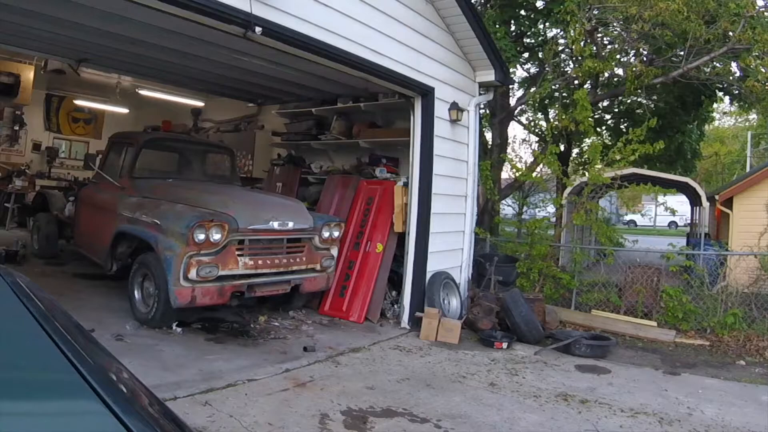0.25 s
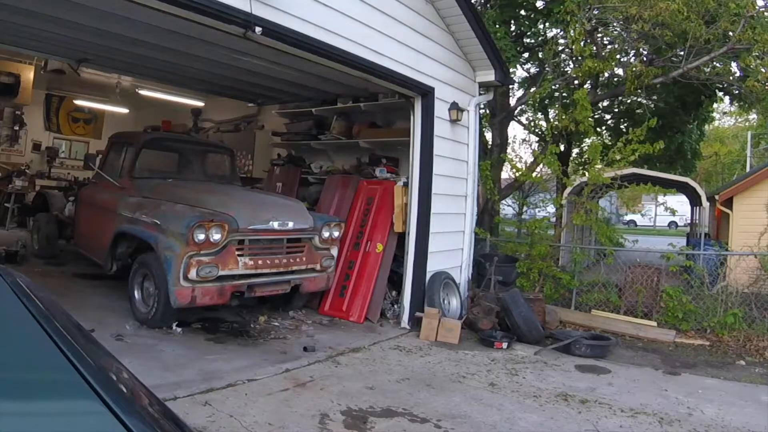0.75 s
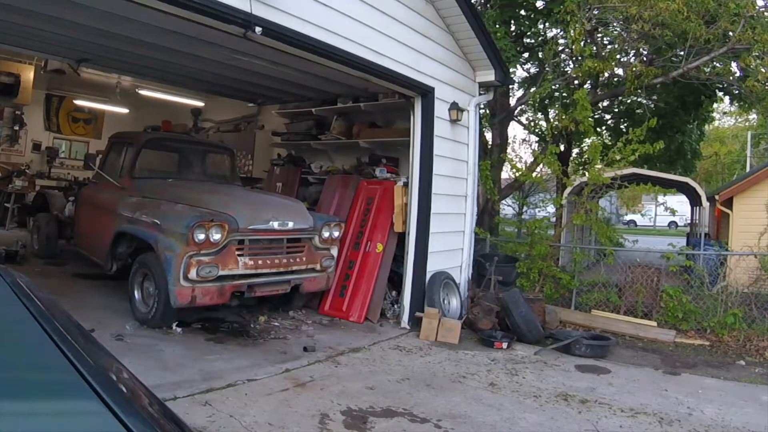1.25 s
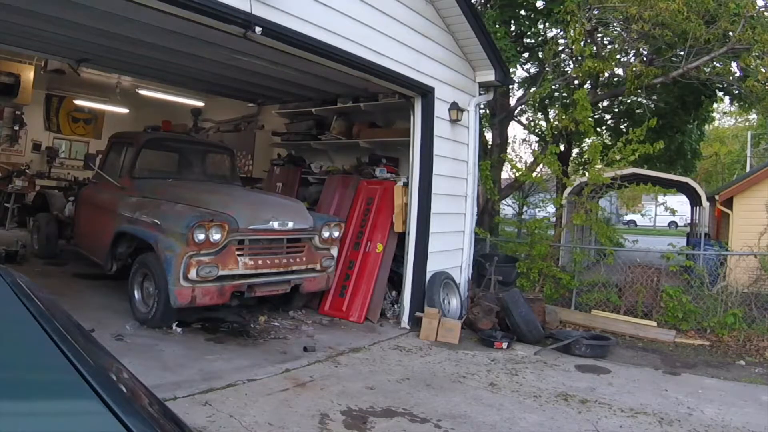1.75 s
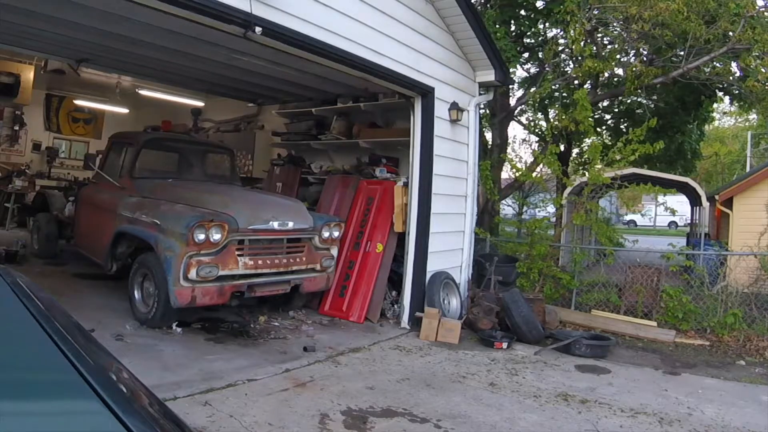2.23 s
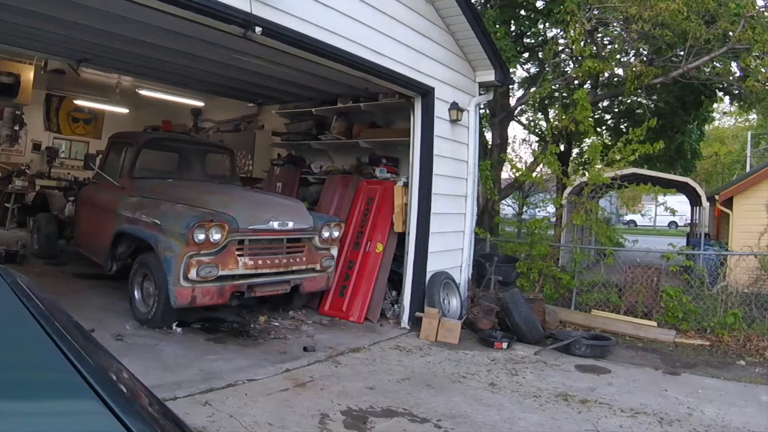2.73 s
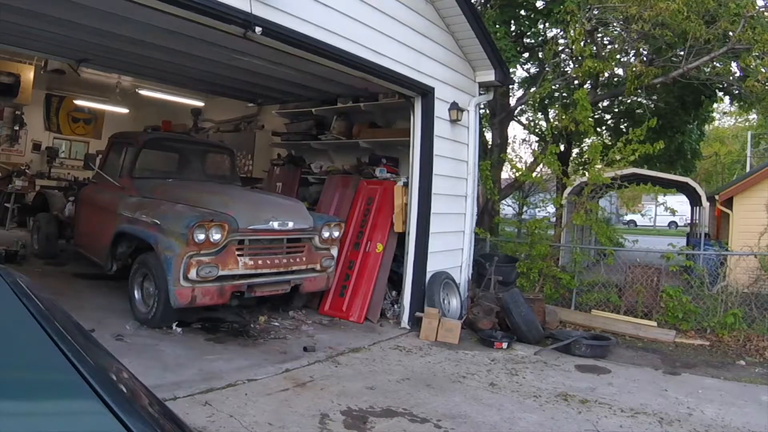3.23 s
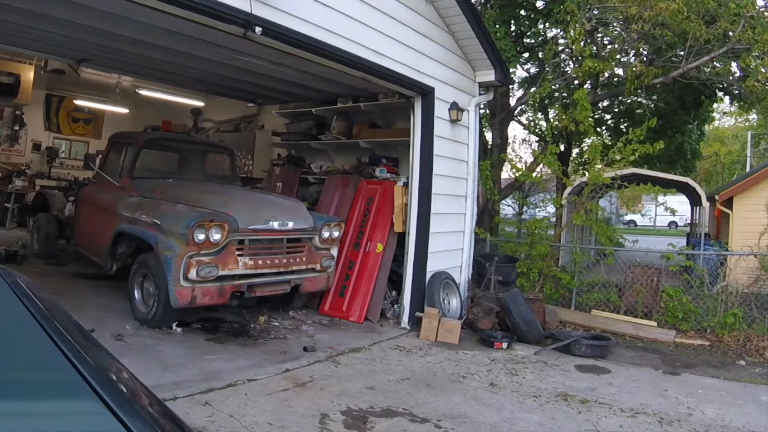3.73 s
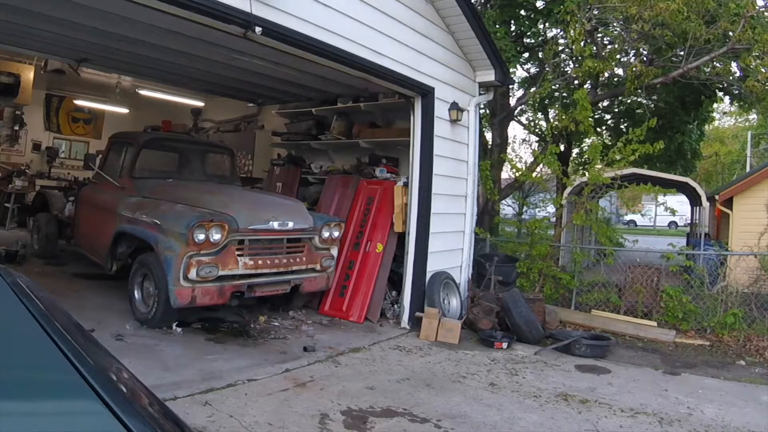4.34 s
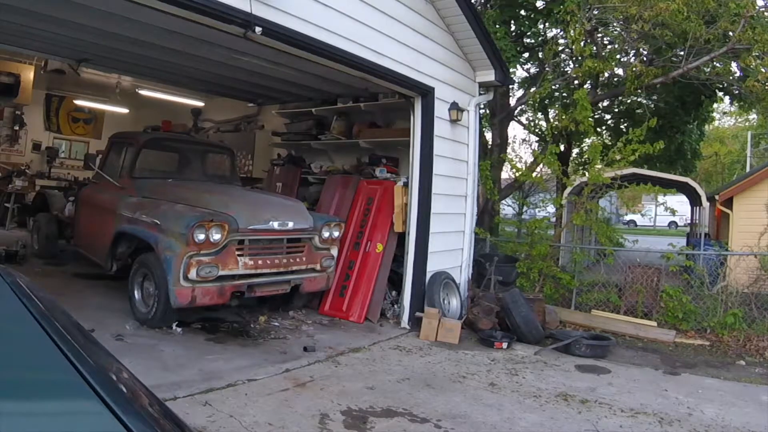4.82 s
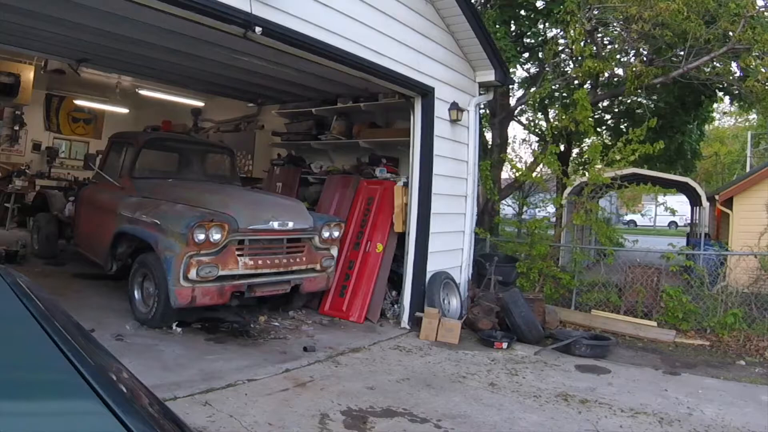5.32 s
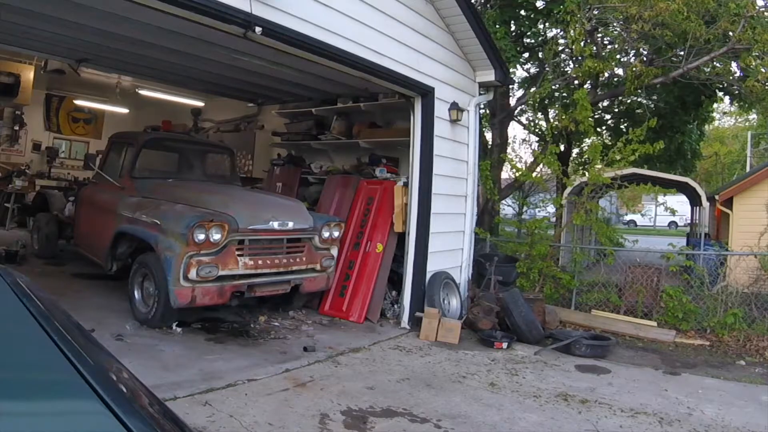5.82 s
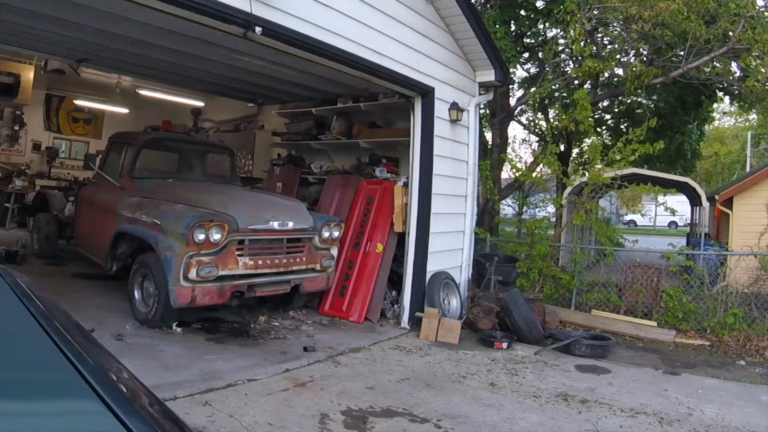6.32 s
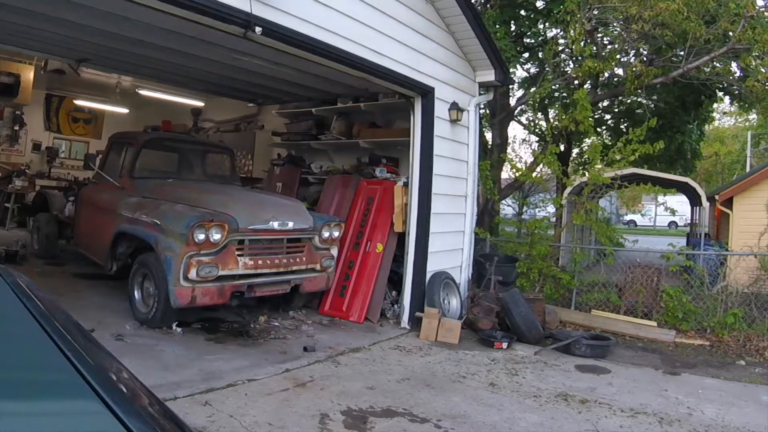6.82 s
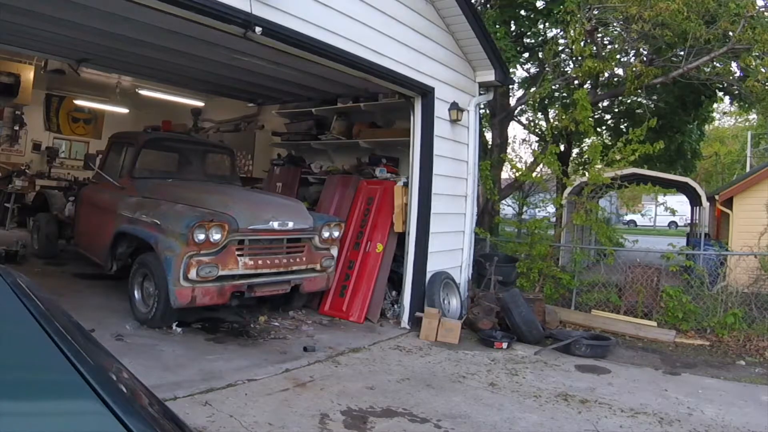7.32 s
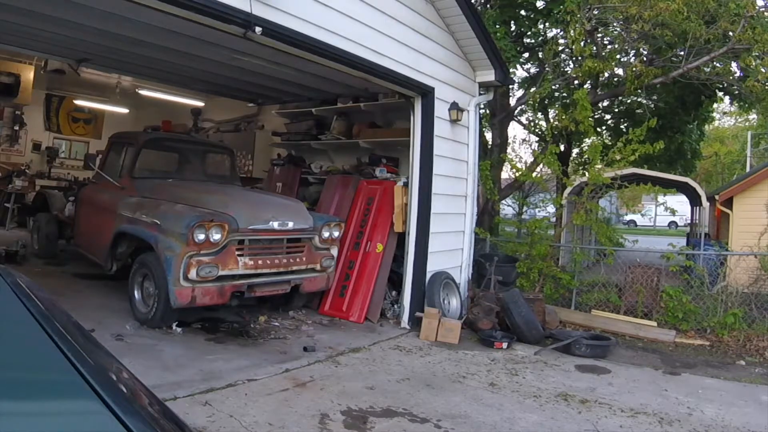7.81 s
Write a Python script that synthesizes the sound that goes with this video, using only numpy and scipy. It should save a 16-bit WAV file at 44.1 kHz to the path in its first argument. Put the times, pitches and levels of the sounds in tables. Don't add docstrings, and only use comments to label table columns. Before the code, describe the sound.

Quiet drive with a bird whistling and a pedal thump, then an old truck's starter grinds, pops, and the V8 catches, flares and settles lumpily.

```python
import sys
import numpy as np
from scipy import signal
from scipy.fft import rfft, irfft, next_fast_len
from scipy.io import wavfile
from scipy.ndimage import uniform_filter1d

SR = 44100
rng = np.random.default_rng(int(sys.argv[2]) if len(sys.argv) > 2 else 0)


def voltage_ratio(decibels):
    exponent = np.asarray(decibels, float) / 20
    return 10 ** exponent


def wav_out(sig):
    wavfile.write(sys.argv[1], SR, np.round(np.clip(np.atleast_2d(sig).T, -1, 1) * 32767).astype(np.int16))


N = 355446
TIME = np.arange(N) / SR


def curve(*tables):
    s, *columns = np.transpose([row for table in tables for row in table])
    return [np.interp(TIME, s, column) for column in columns]


def level(x, db=0):
    return x * voltage_ratio(db) / np.sqrt(np.mean(x ** 2))


def blend(share, db):
    return 1 + share * (voltage_ratio(db) - 1)


def ring(x, hz, width):
    return signal.lfilter(*signal.iirpeak(hz, hz / width, SR), x)


def butter(x, order, hz, kind="low"):
    return signal.sosfilt(signal.butter(order, hz, kind, fs=SR, output="sos"), x)


def colour(x, points):
    size = next_fast_len(N)
    hz, db = np.transpose(points)
    log_hz = np.log(np.arange(size // 2 + 1) * SR / size + 1)
    gain = voltage_ratio(np.interp(log_hz, np.log(hz), db, left=-90, right=-90))
    return level(irfft(rfft(x, size) * gain, size)[:N])


def clicks(s, size):
    at = np.clip(s * SR, 0, N - 2)
    i = at.astype(int)
    return np.bincount(i, size * (i + 1 - at), N) + np.bincount(i + 1, size * (at - i), N)


def walk(rate):
    k = int(SR / rate)
    steps = np.repeat(rng.standard_normal(N // k + 1), k)
    return level(uniform_filter1d(steps, k)[:N])


def tail(x, t60):
    return signal.lfilter([1], [1, -np.exp(-np.log(1000) / (t60 * SR))], x)


def wall_noise(t60):
    return rng.standard_normal(SR // 2) * np.exp(-np.log(1000) * TIME[:SR // 2] / t60)


def garage(x, wet_db, t60):
    walls = wall_noise(t60)
    return x + voltage_ratio(wet_db) * signal.fftconvolve(x, walls / np.sqrt(np.sum(walls ** 2)))[:N]


def swells(events, rise_s, fall_db_s):
    gain = np.zeros(N)
    for s, hold, db in events:
        part = slice(max(int((s - rise_s) * SR), 0), int((s + hold + 70 / fall_db_s) * SR))
        late = TIME[part] - s
        gain[part] += voltage_ratio(db - fall_db_s * (late - hold).clip(0)) * (1 + late / rise_s).clip(0, 1) ** 2
    return gain


# time in seconds, firings per second.
CRANKING = [
    (2.5, 14),
    (3.1, 22),
    (3.5, 36),
    (3.75, 26),
    (4.1, 34),
]
# time in seconds, firings per second.
RUNNING = [(4.4, 43.6), (4.55, 49.25), (4.7, 52.74), (4.85, 59.71), (5, 62.69), (5.2, 62.33), (5.6, 59.81),
           (6, 58.76), (6.3, 58.25), (7.2, 58.05), (7.6, 55.8), (8, 54.4)]


def crank():
    first_cylinder_s = 5.8574
    slots = np.cumsum(curve(CRANKING, RUNNING)[0]) / SR
    return slots - np.interp(first_cylinder_s, TIME, slots)


# pipe (0 left, 1 right), strength in dB, header delay in ms.
CYLINDERS = [(0, -4.5, .07), (1, -2.8, 2.33), (1, 5, 4.17), (0, 1, -1.18), (1, 6.5, .23), (0, 1.2, -1.83),
             (0, 2.4, -1.8), (1, -1.7, 2.09)]
# time in seconds, level in dB.
BURN = [(2.45, -35), (2.66, -45), (2.87, -45.5), (3.1, -37), (3.5, -35), (3.64, -39), (4.0, -38.5),
        (4.3, -35), (4.46, -32.5), (4.62, -21), (4.75, -24.5), (5.2, -26.5), (5.6, -24.5), (6, -25.5),
        (7.2, -24.5), (8.06, -24.5)]
# time in seconds, spread in dB.
UNEVEN = [
    (2.45, 3),
    (4.3, 2.5),
    (4.48, .7),
    (4.75, .7),
    (5.1, 1.5),
    (5.8, .8),
    (7.2, .8),
    (7.7, 1.3),
]
# time in seconds, peak in dB.
POPS = [(2.502, -23.5), (3.113, -17.5), (3.135, -23), (3.161, -8), (3.175, -15), (3.198, -21), (3.223, -21),
        (3.285, -26), (3.317, -21), (3.395, -22), (3.415, -27), (3.482, -21), (3.511, -26), (3.83, -15),
        (3.849, -16.5), (3.865, -27), (3.889, -25), (4.085, -19), (4.123, -14), (4.139, -16.5),
        (4.149, -27), (4.262, -18.5), (4.346, -14), (4.358, -13.5), (4.375, -23), (4.435, -22),
        (4.516, -19), (4.533, -16), (4.57, -17), (4.68, -29), (5.037, -10.5), (5.166, -14)]
# time in seconds, share
FLARE = [
    (4.66, 0),
    (4.73, 1.6),
    (4.88, 1),
    (5.5, 1),
    (5.9, 0),
]
# Hz, width in Hz, signed gain from the left pipe, from the right pipe.
PIPES = [(59.5, 7, -.066, .036), (85.5, 13, .145, -.096), (107.1, 27.8, -.145, .14),
         (116.7, 7, .172, -.353), (156.4, 15.9, .026, .397), (156.3, 40, .036, -.194),
         (203.6, 8.3, -.063, .058), (233.7, 32, -.067, -.02), (267.6, 32, .055, .01), (276, 7, -.111, .02),
         (313.1, 7, -.104, .042), (347.9, 7, .011, -.055), (373.5, 15.2, .027, 0)]
# while flaring in dB, once cooled in dB.
PIPE_SHIFT = [(5, 3.5), (2, -0.5), (-1.5, 2.5), (-4, 3.5), (-6.5, -2), (-8, -1.5), (0, 6.5), (0.5, -5),
              (-1, -6), (-2, -3), (-4, -7), (-1, -4), (-3, 0)]
# Hz, width in Hz, level in dB.
OVERTONES = [(198.5, 5.9, -27), (233.7, 11.6, -25.5), (279, 13, -26.5), (319, 17, -29), (366.6, 10, -29),
             (399.5, 7.5, -26.5), (465.8, 8.7, -29.5), (522.6, 10.4, -30), (590, 8.3, -33.5),
             (693, 8.7, -36.5)]
# while flaring in dB, once cooled in dB.
OVERTONE_SHIFT = [(4, 8), (4, -1), (2, -2.5), (-2, 0), (1.5, -5), (-1, -3), (-0.5, -0.5), (0, 1), (3, 4),
                  (-4, 0)]
# Hz, width in Hz, level in dB.
BOOM = [(73, 17, -2), (98.3, 16, 2), (133, 22, -3.5), (287, 80, -9)]
# Hz, width in Hz, level in dB.
COLD_PIPE = [(41.7, 30, -5), (97.8, 14.3, 2.5), (156.4, 25.5, 1.5), (230.5, 52, -4), (302.6, 60, -5.5),
             (409, 154, -10.5)]
# time in seconds, level in dB.
HOOT = [
    (4.38, -60),
    (4.44, -41),
    (4.53, -31),
    (4.6, -24),
    (4.7, -25),
    (4.76, -34),
    (4.82, -60),
    (5.0, -120),
]
# time in seconds, level in dB.
DRONE = [(4.68, -60), (4.76, -27), (5.0, -24), (5.1, -28.5), (5.3, -25.5), (5.55, -23.5), (5.75, -30.5),
         (5.9, -62), (6.1, -120)]


def firings(slots):
    pop_s, pop_db = np.transpose(POPS)
    burn = voltage_ratio(curve(BURN)[0]) + tail(clicks(pop_s, voltage_ratio(pop_db - 54)), 0.28)
    k = np.arange(np.ceil(slots[int(BURN[0][0] * SR)]), slots[-1]).astype(int)
    pipe, cylinder_db, delay_ms = np.array(CYLINDERS)[k % 8].T
    chance = rng.standard_normal((600, 2))[:len(k)].T
    at = np.interp(k, slots, TIME)
    uneven = np.interp(at, TIME, curve(UNEVEN)[0])
    size = np.interp(at, TIME, burn) * voltage_ratio(uneven * chance[0] + 67.5)
    at = at + (delay_ms + .15 * uneven * chance[1]) / 1000
    return at, size, pipe, cylinder_db


def hot_pipes(at, size, pipe, cylinder_db, hot):
    cooled_pitch = .965
    flare = curve(FLARE)[0]
    cooled = np.interp(TIME, (7.2, 7.7), [0, 1])
    left = hot * clicks(at, size * voltage_ratio(cylinder_db) * (pipe < .5))
    right = hot * clicks(at, size * voltage_ratio(cylinder_db) * (pipe > .5))
    beat = 0
    for (hz, width, a, b), (flare_db, cooled_db) in zip(PIPES, PIPE_SHIFT):
        kicks = blend(flare, flare_db) * (a * left + b * right)
        beat = beat + ring((1 - cooled) * kicks, hz, width)
        beat = beat + ring(cooled * voltage_ratio(cooled_db) * kicks, hz * cooled_pitch, width)
    beat = butter(beat, 2, 48, "high")
    swirl = hot * rng.standard_normal(N) * tail(clicks(at, size * voltage_ratio(.5 * cylinder_db - 33)), .2)
    rasp = 0
    for (hz, width, db), (flare_db, cooled_db) in zip(OVERTONES, OVERTONE_SHIFT):
        gain = voltage_ratio(db) * blend(flare, flare_db) * blend(cooled, cooled_db)
        rasp = rasp + ring(gain * swirl, hz, width)
    return beat + rasp


def cold_pipes(puffs):
    boom = sum((-1) ** k * voltage_ratio(db - 15.5) * ring(puffs, hz, width) for k, (hz, width, db) in enumerate(BOOM))
    pop_s, pop_db = np.transpose(POPS)
    coughs = voltage_ratio(-6) * puffs + clicks(pop_s, voltage_ratio(pop_db + 50))
    coughs = coughs + rng.standard_normal(N) * tail(clicks(pop_s, voltage_ratio(pop_db + 19)), .2)
    cold = sum((-1) ** k * voltage_ratio(db) * ring(coughs, hz, width) for k, (hz, width, db) in enumerate(COLD_PIPE))
    return garage(voltage_ratio(-15) * cold, -2.1, 0.26) + garage(boom, -1.2, 0.39)


def pipe_tones(slots):
    hoot = np.sin(2 * np.pi * 2 * slots) * voltage_ratio(curve([(0, -120)], HOOT)[0])
    drone_db = curve([(0, -120)], DRONE)[0] + 1.2 * walk(15)
    return hoot + np.sin(2 * np.pi * 21 / 8 * slots) * voltage_ratio(drone_db)


def exhaust(slots):
    at, size, pipe, cylinder_db = firings(slots)
    hot = np.interp(TIME, (4.54, 4.7), [0, 1])
    ringing = hot_pipes(at, size, pipe, cylinder_db, hot)
    cold = cold_pipes((1 - hot) * clicks(at, size))
    gas = ring(rng.standard_normal(N), 210, 330) * tail(clicks(at, size * voltage_ratio(cylinder_db)), 0.26)
    return butter(ringing + cold + pipe_tones(slots) + voltage_ratio(-80) * gas, 2, 1000)


# time in seconds, level in dB.
LOAD = [(2.56, -39.5), (2.65, -47.5), (2.73, -46.5), (2.815, -52.5), (2.84, -47.5), (2.9, -45.5),
        (2.99, -39.5), (3.24, -38), (3.37, -36), (3.42, -41.5), (3.73, -46.5), (3.81, -43), (3.97, -46.5),
        (4.16, -40), (4.21, -43.5), (4.39, -40), (4.75, -39.5), (5.0, -42.5), (5.5, -44), (6.3, -44),
        (8.06, -44.5)]
# time in seconds, hold in seconds, level in dB.
RATTLES = [(2.44, 0.012, -29.5), (2.497, 0.0028, -22.5), (2.685, 0.044, -39.5), (3.1, 0.13, -50),
           (3.3, 0.13, -39), (3.79, .04, -60), (4.13, 0.034, -48), (4.33, 0.084, -53), (4.6, 0.31, -65),
           (6.625, .02, -54), (7.45, .04, -58)]
# time in seconds, peak in dB.
TICKS = [(4.0757, -23), (4.1066, -22), (4.2493, -22), (4.3001, -41), (4.3321, -19), (4.381, -33),
         (4.5196, -35), (4.5631, -40), (4.604, -31), (4.6808, -26), (4.7317, -43), (4.7761, -20),
         (4.821, -35), (4.9497, -35), (4.9796, -37), (5.262, -45), (5.3418, -29), (5.466, -36),
         (5.4989, -46), (5.7908, -35), (6.125, -34), (6.2777, -34), (6.3535, -30), (6.4223, -38),
         (6.5615, -28), (6.6104, -46), (6.9661, -38), (7.0873, -45), (7.1347, -42), (7.3901, -25.5),
         (7.431, -44), (7.5632, -40), (7.6665, -26), (7.8441, -39)]
# Hz, dB per Hz.
CLATTER_HIGH = [(2060, -56), (3500, -2.5), (4050, -3.5), (4540, 2.5), (5790, 4.5), (6010, 3), (6370, -8.5),
                (6790, -10), (8810, -23), (10200, -27.5), (11100, -72), (14400, -62), (22000, -120)]
# Hz, dB per Hz.
CLATTER_LOW = [(470, -0.5), (800, -6.5), (1020, -10.5), (1600, -7.5), (1900, -6), (2730, -9.5), (2970, -6),
               (4200, -12), (5460, -22), (9240, -120)]
# Hz, width in Hz, level in dB.
CASTING = [(2640, 39, 4), (3700, 47, 5), (4460, 47, 16), (4870, 42, 21.5), (5290, 41, 21),
           (5770, 140, 13.5)]


def grains():
    return rng.standard_normal(N) * voltage_ratio(0.93 * rng.exponential(size=N // 32 + 1).repeat(32)[:N])


def clatter(slots):
    load_db = curve(LOAD)[0]
    rattle = swells(RATTLES, .021, 283)
    ticks = swells([(s, .004, db - 10.5) for s, db in TICKS], .004, 326)
    start_s = RATTLES[0][0]
    running = np.interp(TIME, [start_s - .012, start_s + .01], [0, 1])
    unmeshed_db = -4 * (TIME < 2.83)
    high = running * voltage_ratio(-43.5 + 1.43 * (load_db + 45) + unmeshed_db)
    low = running * voltage_ratio(load_db) + voltage_ratio(-23) * rattle
    rush = grains()
    casting = level(sum(voltage_ratio(db) * ring(rush, hz, width) for hz, width, db in CASTING))
    bright = level(colour(rush, CLATTER_HIGH) + 0.33 * casting)
    bright = bright + sum(ring(bright, hz, 900) * (voltage_ratio(1.2 * walk(16)) - 1) for hz in (3600, 4700, 5600))
    dull = colour(grains(), CLATTER_LOW) * voltage_ratio(0.67 * walk(18))
    heavy = butter(bright, 4, 7000)
    loose = np.sqrt(high ** 2 + rattle ** 2 + ticks ** 2) - high
    cycle_db = 0.68 * np.cos(2 * np.pi * (slots / 8 - .3)) + 0.63 * walk(25)
    return (bright * high + heavy * loose + dull * low) * voltage_ratio(cycle_db)


# Hz, width in Hz, level in dB.
HOUSING = [(263, 20, -3), (347, 22, -7.5), (418, 23, -6), (508, 25, -2.5), (552, 20, -4), (790, 20, -0.5),
           (1000, 120, -10), (650, 630, -25)]
# Hz, width in Hz, level in dB.
PINION = [(1494, 33, 1.5), (2190, 160, 1.5), (2530, 110, 5), (3110, 31, 3.5)]
# time in seconds, hold in seconds, ring in dB.
STRAINS = [
    (2.51, 0.0075, -34),
    (2.985, 0.019, -43),
    (3.14, 0.11, -45.5),
    (3.33, 0.082, -37.5),
    (3.78, 0.11, -43.5),
]
# time in seconds, Hz, level in dB.
WHINE = [(2.56, 555, -60), (2.68, 552, -48.5), (2.85, 548, -69), (2.99, 552, -41), (3.08, 545, -65),
         (3.21, 555, -43), (3.27, 572, -42), (3.36, 530, -43), (3.46, 545, -64), (3.6, 552, -53),
         (3.72, 528, -55), (3.82, 512, -44), (3.98, 546, -63)]


def patchy_ring(x, modes):
    total = 0
    for hz, width, db in modes:
        gain = voltage_ratio(3 * rng.standard_normal(80))
        total = total + voltage_ratio(db) * np.interp(TIME[:len(x)] * 16, np.arange(80), gain) * ring(x, hz, width)
    return np.pad(level(total), (0, N - len(x)))


def gear_whine():
    hz, db = curve(WHINE)
    phase = 2 * np.pi * np.cumsum(hz * (1 + 0.0073 * walk(30))) / SR
    whine = np.sin(phase) * voltage_ratio(db + 3.5 + 3.36 * walk(22.17))
    first_s, last_s = WHINE[0][0], WHINE[-1][0]
    return whine * swells([(first_s, last_s - first_s, 0)], .03, 300)


def starter():
    on_s, off_s = 2.45, 4.05
    end = int(4.5 * SR)
    teeth_s = np.cumsum((1 + .35 * rng.standard_normal(800)).clip(.2) / 270) + on_s
    sharp = clicks(teeth_s, voltage_ratio(2.5 * rng.standard_normal(800)))
    knocks = uniform_filter1d(uniform_filter1d(sharp, size=16), size=16)
    body = patchy_ring(knocks[:end], HOUSING)
    pinion = patchy_ring(uniform_filter1d(sharp[:end], size=5), PINION)
    engaged = swells([(on_s, off_s - on_s, 0)], .01, 400)
    engaged = engaged * voltage_ratio(np.interp(TIME, (on_s, off_s), [0, -5.5]))
    housing_gain = np.hypot(engaged * voltage_ratio(-43.5 + 0.66 * walk(14)), swells(STRAINS, .043, 304))
    pinion_gain = engaged * voltage_ratio(curve(LOAD)[0] - 3.5)
    return gear_whine() + body * housing_gain * voltage_ratio(-3.5) + pinion * pinion_gain


# time in seconds, peak in dB, lower half relative in dB.
BLOWS = [(2.427, -46, 1), (2.443, -40.5, 15), (2.493, -24, 28), (2.8305, -29, -3), (2.971, -24.5, 20),
         (3.142, -16.5, -14), (3.781, -26, -23), (3.812, -25, -21), (4.075, -29, 15), (4.106, -27, -6),
         (4.3814, -25, -11)]
# Hz, width in Hz, level in dB.
PLUNGER = [(1780, 120, -12), (2627, 70, 4), (2200, 150, -11)]


def blows():
    s, db, low_db = np.transpose(BLOWS)
    high, low = clicks(s, voltage_ratio(db)), clicks(s, voltage_ratio(db + low_db))
    crack = colour(rng.standard_normal(N), CLATTER_HIGH) * (tail(high, 0.2) + 0.11 * tail(high, 0.45))
    noise = rng.standard_normal(N) * (tail(low, 0.13) + 1.2 * tail(low, 0.12))
    slam = noise * (TIME < BLOWS[2][0])
    plunger = sum(voltage_ratio(gain_db) * ring(slam, hz, width) for hz, width, gain_db in PLUNGER)
    return voltage_ratio(-8.5) * ring(crack, 2600, 3600) + voltage_ratio(14.5) * plunger + voltage_ratio(-34) * ring(noise, 2400, 1400)


# time in seconds, click in dB, thud in dB.
THUMPS = [
    (1.138, -60.5, -48),
    (1.322, -61.5, -60.5),
]


def pedal():
    s, click_db, thud_db = np.transpose(THUMPS)
    click = colour(rng.standard_normal(N), CLATTER_HIGH) * tail(clicks(s, voltage_ratio(click_db)), 0.38)
    click = ring(ring(click, 4800, 2500), 4800, 2500)
    thud = rng.standard_normal(N) * tail(clicks(s + 0.019, voltage_ratio(thud_db)), 0.58)
    thud = thud + clicks(s + .016, voltage_ratio(thud_db + 24))
    floor_pan = [(107, 16, 30), (203, 12, 24.5), (269, 6.4, 25), (350, 11, 18.5), (600, 230, -22)]  # Hz, width, dB
    return click + sum(voltage_ratio(db) * ring(thud, hz, width) for hz, width, db in floor_pan)


# time in seconds, length in seconds, start in Hz, end in Hz, level in dB.
BIRD = [(0.142, .038, 3440, 3620, -75), (0.175, 0.081, 2660, 3050, -69), (0.278, 0.082, 2520, 2203, -71),
        (0.325, .046, 2220, 2660, -70), (0.356, 0.049, 2760, 2530, -66), (0.64, 0.043, 2330, 2650, -69.5),
        (.689, 0.036, 2430, 2170, -67), (.745, 0.033, 3070, 3300, -71), (0.777, 0.04, 2730, 2640, -63),
        (1.08, 0.095, 3250, 3690, -72.5), (1.158, 0.044, 3210, 2320, -65),
        (1.185, 0.075, 2330, 2670, -64.5), (1.537, 0.042, 2570, 2860, -67), (1.57, 0.0204, 2830, 2290, -69),
        (1.588, .045, 2200, 2220, -65), (1.643, 0.033, 2820, 2264, -65), (1.672, 0.033, 2320, 2250, -62.5),
        (.335, 0.053, 2200, 2260, -77), (1.194, 0.088, 2320, 2247, -71.5), (0.712, 0.05, 2170, 2550, -72)]
# delay in seconds, level in dB.
WALL_ECHOES = [
    (0.064, 0.5),
    (.13, -16),
]


def bird():
    song = np.zeros(N)
    for s, length, from_hz, to_hz, db in BIRD:
        n, i = int(length * SR), int(s * SR)
        u = np.linspace(0, 1, n)
        rise = (1.2 * u).clip(0, 1)
        glide = rise * rise * (3 - 2 * rise) if to_hz > from_hz else 1 - (1 - u) ** 2
        phase = 2 * np.pi * np.cumsum(from_hz + (to_hz - from_hz) * glide) / SR
        song[i:i + n] += voltage_ratio(db + 3.5) * np.sin(phase) * np.hanning(n) ** 0.23
    song = song * voltage_ratio(1.5 * walk(97))
    reflected = ring(song, 2700, 2600)
    song = song + sum(voltage_ratio(db) * np.roll(reflected, int(s * SR)) for s, db in WALL_ECHOES)
    return song + voltage_ratio(-35) * signal.fftconvolve(song, wall_noise(0.63))[:N]


# Hz, dB per Hz.
TOWN = [(12, -16.5), (20, -10.5), (80, -1), (146, -11.5), (507, -24.5), (555, -23.5), (1500, -31),
        (1950, -62), (3300, -120)]
# Hz, dB per Hz.
AIR = [(880, -28), (1500, -5.5), (1930, -3.5), (2630, -6), (3500, -11.5), (3740, -17.5), (5050, -10.5),
       (6830, -10), (10200, -16), (11100, -22.5), (14400, -28), (22000, -120)]


def town():
    traffic = colour(rng.standard_normal(N), TOWN)
    rumble = ring(traffic, 90, 160)
    hiss = level(colour(rng.standard_normal(N), AIR), -69)
    return level(traffic + rumble * (voltage_ratio(0.67 * walk(4.4)) - 1), -53.5) + hiss


def scene():
    slots = crank()
    mono = exhaust(slots) + clatter(slots) + starter() + blows() + pedal() + bird() + town()
    return np.array([mono, mono])


def band_limit(x):
    return signal.sosfilt(signal.butter(12, 14200, fs=SR, output="sos"), x)


def record(dry):
    fade = ((N - np.arange(N)) / 400).clip(.3, 1)
    mix = .32 * np.tanh(dry / .32) * fade
    dull = signal.sosfilt(signal.ellip(8, .2, 40, 10900, fs=SR, output="sos"), mix)
    mix = np.where(TIME > BLOWS[0][0] - .015, dull, mix)
    return band_limit(mix)


dry = scene()
out = record(dry)
wav_out(out)
```